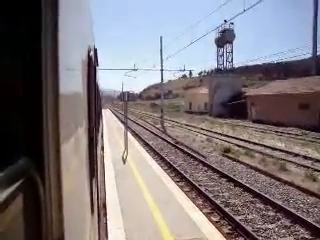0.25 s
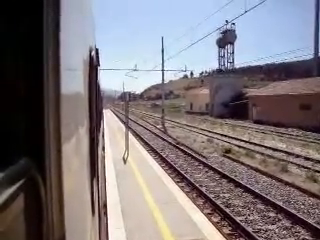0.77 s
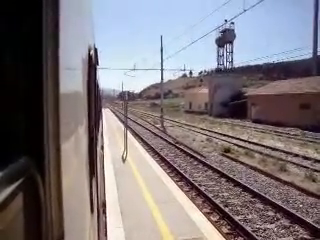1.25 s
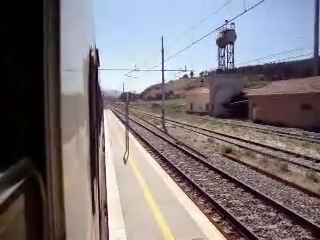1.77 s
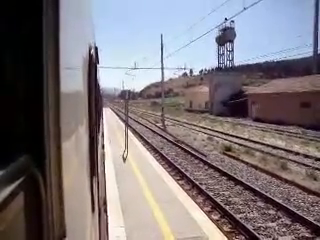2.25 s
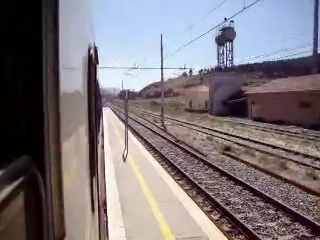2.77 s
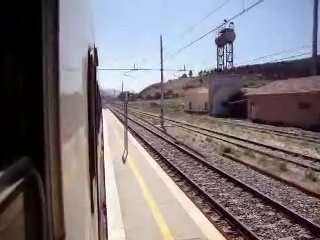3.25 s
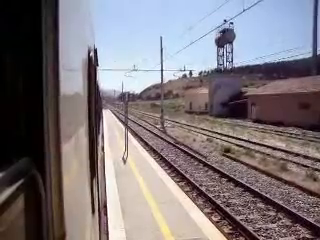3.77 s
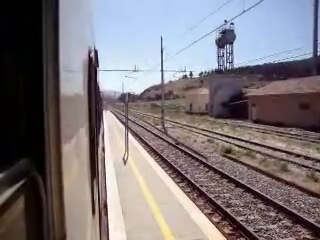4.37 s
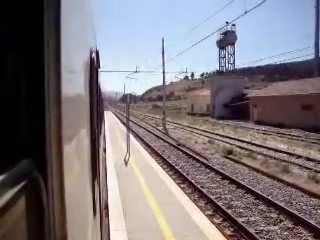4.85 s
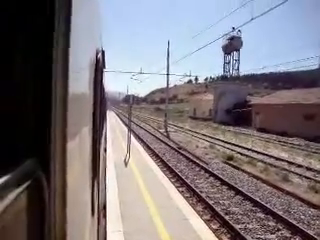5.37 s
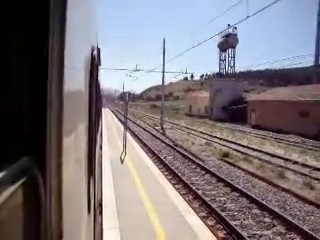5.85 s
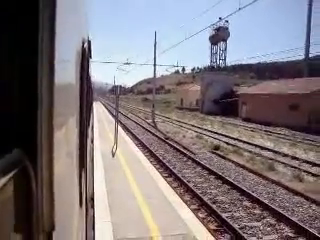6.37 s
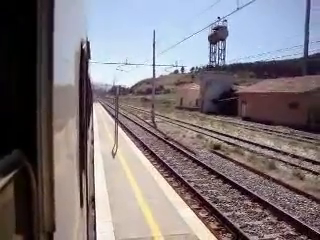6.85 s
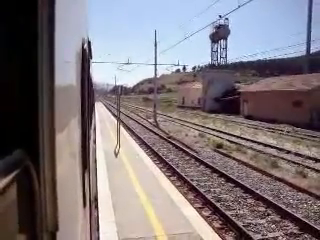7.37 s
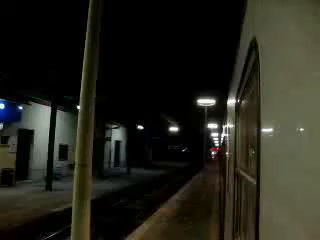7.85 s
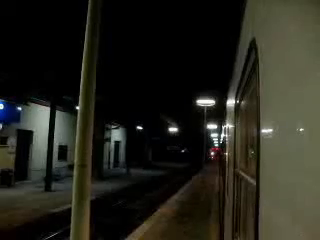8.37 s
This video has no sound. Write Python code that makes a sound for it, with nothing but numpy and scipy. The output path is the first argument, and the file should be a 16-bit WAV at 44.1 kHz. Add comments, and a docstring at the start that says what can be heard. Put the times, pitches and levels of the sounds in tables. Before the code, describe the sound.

A standing electric train hums and whines while wind slaps the microphone, then a machine briefly throbs on a night platform.

```python
"""A standing electric train, heard from its open door: fans and converters hum and whine.
Gusts buffet the microphone with low noise, slaps and cracks.
After a short silence, a platform at night: a machine throbs and drones in a few casing resonances.
A 32 kHz sample-and-hold onto the faster output grid mirrors every tone around 12 kHz."""
import sys
import numpy as np
from scipy import signal
from scipy.fft import rfft, irfft, next_fast_len
from scipy.io import wavfile
from scipy.ndimage import uniform_filter1d, map_coordinates

SR = 44100
rng = np.random.default_rng(int(sys.argv[2]) if len(sys.argv) > 2 else 0)


def materialize(psi):
    """Save the field psi as 16-bit PCM at rate SR to the path in sys.argv[1].

    A 1-D psi becomes a single channel; in a 2-D psi each row is a channel.
    """
    bounded = np.clip(np.atleast_2d(psi).T, -1, 1)
    quanta = np.round(bounded * 32767).astype(np.int16)
    wavfile.write(sys.argv[1], SR, quanta)


N = 379260

# Train hum: t/s, relative level/dB
TRAIN_LEVEL = [(0.0, -26.5), (0.57, -25), (1.5, -21), (1.85, -23.5), (2.1, -22.5), (2.95, -21.5),
               (3.71, -22), (4.24, -20.5), (4.94, -22.5), (5.86, -21.5), (6.08, -26.5), (6.31, -28),
               (7.09, -25.5), (7.26, -28), (7.41, -33), (7.43, -27), (7.58, -33)]
# Fan air noise: f/Hz, relative density/dB
FAN_SPECTRUM = [(30, -26.5), (150, -17.5), (500, -9.5), (900, -2), (1580, -8), (1720, -3.5), (2200, -6),
                (2280, -9), (2800, -13.5), (3550, -15.5), (4100, -13.5), (6500, -23), (10000, -33.5),
                (15800, -90)]
# Motor and converter tones: f/Hz, relative level/dB
TRAIN_TONES = [(183, -46), (341.4, -31), (731.6, -37), (914.6, -35), (987.4, -35), (1050, -39), (1184, -40),
               (1365.8, -34), (1427, -40), (1466.9, -36), (1711.4, -28), (1880, -40), (1955.9, -36),
               (2176, -36), (2200.4, -32), (2444.9, -38), (2665, -44), (2689.4, -42), (2955, -46),
               (3178.4, -44), (3398, -46), (3422.9, -44), (3693, -49), (3911.8, -45), (4597, -51),
               (4889.8, -51)]
# Lift of the tones above 1.5 kHz: t/s, gain/dB
WHINE_GAIN = [(0, 0), (1.2, -2), (2.2, 1.5), (4.5, 0), (5, -0.5), (6.2, 0), (7.6, -1)]
# Steady wind: t/s, relative level/dB
WIND_LEVEL = [(0.0, -42), (0.6, -40), (1.3, -37), (2.3, -43), (3.4, -41.5), (4.2, -40), (5.0, -33.5),
              (5.7, -36), (6.0, -24), (6.5, -29.5), (7.15, -26), (7.34, -42), (7.58, -28)]
# Buffeting: f/Hz, relative density/dB
BUFFET_SPECTRUM = [(25, -35), (60, -12), (150, -2), (300, -2), (600, -6.5), (1500, -17.5), (4000, -45),
                   (15000, -73.5)]
# Soft gusts: peak t/s, relative level/dB, half length/s
SOFT_GUSTS = [(0.407, -31.5, .1), (0.98, -35, 0.041), (1.344, -40, 0.045), (1.685, -30.5, 0.025),
              (3.307, -31.5, .03), (3.41, -32, 0.024), (3.59, -24, 0.037), (4.312, -25.5, 0.034),
              (4.44, -27, 0.037), (4.645, -32, 0.044), (4.853, -41.5, 0.032), (5.244, -29, 0.028),
              (5.33, -29.5, 0.024), (5.82, -30, 0.028)]
# Wind slaps: peak t/s, relative level/dB, f/Hz, relative crack gain/dB, decay scale/ms
WIND_SLAPS = [(0.043, -10.5, 392, -22, 2.1), (0.086, -12, 462, -21, 5.8), (0.215, -12.5, 407, -20, 2.1),
              (0.227, -12, 455, -23, 2.7), (0.334, -10, 403, -13, 1.8), (0.386, -15, 530, -10, 1.1),
              (0.531, -9, 570, -17, 1.9), (0.602, -11.5, 586, -8, 2.8), (1.739, -10, 530, -13, 2.2),
              (1.797, -10, 513, -25, 2.2), (1.849, -13, 345, -20, 3.8), (1.897, -8, 460, -20, 2),
              (3.735, -10, 390, -20, 2.8), (4.737, -8.5, 400, -21, 1.4), (5.031, -13.5, 534, -20, 2),
              (5.084, -13.5, 630, -18, 1.3), (5.097, -13, 436, -11, 1.4), (5.883, -13, 487, -14, 1.4),
              (5.952, -10.5, 550, 1, 1.7), (5.977, -9, 520, -11, 2), (5.994, -8.5, 554, -22, 1.7),
              (6.008, -12, 470, -20, 1.7), (6.046, -10.5, 295, -26, 4), (6.07, -12, 302, -26, 2.9),
              (6.101, -11, 344, -26, 1.7), (6.114, -10.5, 700, -4, 1.8), (6.186, -12, 337, -26, 1.8),
              (6.262, -10.5, 440, -24, 1.5), (6.368, -15, 344, -24, 2.6), (6.433, -10.5, 557, -20, 1.8),
              (6.535, -13, 610, -22, 1.4), (6.558, -10.5, 600, -15, 2.2), (6.573, -11.5, 720, -22, 2.6),
              (6.604, -7.5, 500, -22, 1.2), (6.63, -9, 440, -26, 3.4), (6.642, -12, 594, -20, 2),
              (6.739, -14, 436, -26, 5.4), (6.83, -12.5, 710, -20, 1.1), (6.858, -17, 640, -8, 1.3),
              (6.902, -14, 700, -11, 1.3), (6.971, -11, 530, -18, 1.5), (7.002, -10.5, 476, -17, 1.3),
              (7.023, -13, 270, -9, 2.1), (7.089, -12, 497, -25, 1.4), (7.182, -7.5, 430, -19, 1.6),
              (7.199, -11.5, 515, -1, 2.6), (7.222, -7.5, 567, -15, 3.7), (7.237, -12, 619.4, -10.5, 3.6),
              (7.247, -12, 764, 0.5, 4.4), (7.271, -15.5, 640, -19, 3.8), (7.415, -14.5, 630, -21.5, 2.3),
              (7.44, -9.5, 550, -14, 3.5), (7.49, -14, 504, -16, 2), (7.519, -13.5, 450, 2, 1.8),
              (7.525, -9, 386, 0, 0.73), (7.565, -5.5, 740, -4.5, 1.76)]
# Night machine resonances: f/Hz, width/Hz, relative level/dB
CASING_MODES = [(218.6, 16, -9), (412, 28, -7.5), (492, 15, -5), (570, 30, -3), (710, 51, -2.5),
                (760, 60, -3), (1006, 38, 2.5), (1040, 20, -7), (1257, 130, 0), (1400, 30, -8.5),
                (1742, 20, -6)]
# Night machine broad noise: f/Hz, relative density/dB
DRONE_SPECTRUM = [(25, -64), (80, -19.5), (200, -19.5), (450, -11.5), (800, -7), (1250, -3.5),
                  (1600, -14.5), (2100, -21.5), (3200, -26.5), (4100, -31), (4500, -28), (5500, -32),
                  (6000, -37.5), (15800, -47.5)]


def train():
    """Fan noise under wavering motor and converter tones, plus faint shaft harmonics."""
    shaft_hz = 24.449
    t, whine_db = np.arange(N) / SR, curve(WHINE_GAIN)
    tones = np.zeros(N)
    for hz, db in TRAIN_TONES:
        gain = amp(db + (hz > 1500) * whine_db + 2 * wobble(5))
        tones += gain * np.sin(2 * np.pi * (hz * t + rng.random()) + hz / 5000 * wobble(8))
    pattern = rng.standard_normal(SR // 10)  # repeats each turn
    turns = shaft_hz * t + 0.00036 * wobble(8)
    shaft = map_coordinates(pattern, [turns % 1 * len(pattern)], mode="grid-wrap")
    air = amp(0.6 * wobble(12)) * noise(colour(FAN_SPECTRUM), patchy_db=0.78)
    air += amp(-7) * unit(filtered(shaft, colour(FAN_SPECTRUM)))
    return amp(curve(TRAIN_LEVEL) + 1) * (air + amp(22.5) * tones)


def wind_buffet():
    """Eddies on the microphone port: lumpy low noise, swelling in gusts and around each slap."""
    puff_db, puff_rise_s, puff_fall_s = -17, 0.011, 0.023
    lumps = amp(1.5 * wobble(35) + 2.5 * wobble(150)) * rng.standard_normal(N)
    gusts = [(s, db, half_s, half_s) for s, db, half_s in SOFT_GUSTS]
    puffs = [(s, db + puff_db, puff_rise_s, puff_fall_s) for s, db, *_ in WIND_SLAPS]
    level_db = swells(curve(WIND_LEVEL), gusts + puffs)
    return amp(level_db + 2) * unit(filtered(lumps, colour(BUFFET_SPECTRUM)))


def wind_slaps():
    """Eddies burst on the port: a sharp push and a crack amid a few uneven, slowing swings."""
    swings, cracks, half = np.zeros(N + SR), np.zeros(N + SR), SR // 50
    t = np.arange(-half, half) / SR
    push = 0.7 * np.exp(-(t / 0.0003) ** 2)
    from_peak_ms = 1000 * np.where(t < 0, -1.1 * t, t)  # rise faster than fall
    for peak_s, db, hz, crack_db, decay_ms in WIND_SLAPS:
        start = round(peak_s * SR) - half
        span = slice(start, start + len(t))
        decay = from_peak_ms / decay_ms
        drift = np.cumsum(rng.standard_normal(len(t))) / np.sqrt(SR / hz)
        phase = 2 * np.pi * hz * (t - 40 * t * t) + 1.46 * (drift - drift[half])
        swing = np.exp(-(decay / 1.72) ** 0.97) * np.cos(phase)
        swings[span] += rng.choice([-1, 1]) * amp(db) * (push + swing)
        cracks[span] += amp(db + crack_db) * np.exp(-decay / 1.05) * rng.standard_normal(len(t))
    highpass = lambda f: (1j * f / 120 / (1 + 1j * f / 120)) ** 2
    bandpass = lambda f: 1j * f * 2500 / (1800 ** 2 - f * f + 1j * f * 2500) / (1 + 1j * f / 3500) ** 3
    return filtered(swings[:N], highpass) + amp(13.5) * filtered(cracks[:N], bandpass)


def night_machine():
    """Noise rings in the casing and throbs evenly; the broad hiss is steadier."""
    steady_db, throb_db = -27, -21.5
    first_s, period_s, rise_s, fall_s = 7.655, 0.2077, 0.022, 0.14
    level_db = swells(steady_db, [(first_s + k * period_s, throb_db, rise_s, fall_s) for k in range(5)])
    casing = lambda f: np.sqrt(sum(amp(2 * db) / (1 + (2 * (f - hz) / width_hz) ** 2) ** 2
                                   for hz, width_hz, db in CASING_MODES))
    ring = amp(level_db + 0.88 * wobble(30)) * noise(casing, patchy_db=1.5)
    hiss_db = 0.54 * level_db - 10.34 + 0.75 * wobble(33)
    return ring + amp(hiss_db) * noise(colour(DRONE_SPECTRUM), patchy_db=2.0)


def amp(db):
    """dB to gain."""
    return 10 ** (np.asarray(db) / 20)


def unit(x):
    """x at rms 1."""
    return x / np.sqrt(np.mean(x ** 2) + 1e-20)


def curve(rows):
    """Rows (t/s, level/dB) to dB per sample."""
    times_s, db = np.transpose(rows)
    return np.interp(np.arange(N) / SR, times_s, db)


def swells(steady_db, rows):
    """Power sum in dB of a steady level and swells (t/s, level/dB, rise/s, fall/s)."""
    t = np.arange(N) / SR
    power = sum(amp(2 * db) * np.exp(-((t - s) / np.where(t < s, rise_s, fall_s)) ** 2)
                for s, db, rise_s, fall_s in rows)
    return 10 * np.log10(amp(2 * steady_db) + power)


def wobble(rate_hz):
    """Smooth random curve, knots at rate_hz."""
    knots = rng.standard_normal(int(N * rate_hz / SR) + 4)
    return map_coordinates(knots, [np.arange(N) * rate_hz / SR])


def filtered(x, response):
    """FFT filter with gain response(f/Hz)."""
    size = next_fast_len(N + 8192)
    return irfft(rfft(x, size) * response(np.fft.rfftfreq(size, 1 / SR)), size)[:N]


def colour(rows):
    """Response through rows (f/Hz, level/dB) on a log axis."""
    hz, db = np.transpose(rows)
    return lambda f: amp(np.interp(np.log(f + 1), np.log(hz + 1), db))


def noise(response, patchy_db):
    """Coloured noise, rms 1, with random gain patches in time and frequency."""
    bins = signal.stft(rng.standard_normal(N), nperseg=512)[2]
    patches = uniform_filter1d(rng.standard_normal(bins.shape), size=6, axis=0)
    patches = unit(uniform_filter1d(patches, size=10, axis=1))
    patchy = signal.istft(bins * amp(patchy_db * patches), nperseg=512)[1][:N]
    return unit(filtered(patchy, response))


def scene():
    """Train and wind, silence, night machine; dual mono."""
    day_end_s, night_start_s = 7.579, 7.668
    t = np.arange(N) / SR
    day = np.clip((day_end_s - t) / 0.0096, 0, 1)
    night = np.clip((t - night_start_s) / 0.028, 0, 1)
    mono = day * (train() + wind_buffet() + wind_slaps()) + night * night_machine()
    return np.array([mono, mono])


def record(dry):
    """Soft clip, sample-and-hold restarted each block, band limit."""
    hold_hz, top_hz, block_samples = 32000, 15750, 1587
    clipped = dry[0] / (1 + np.abs(dry[0] / 0.75) ** 6) ** (1 / 6)
    block, offset = np.divmod(np.arange(N), block_samples)
    held_at = block * block_samples + np.floor(offset * hold_hz / SR) * SR / hold_hz
    mono = filtered(map_coordinates(clipped, [held_at]), lambda f: f < top_hz)
    return np.array([mono, mono])


dry = scene()
out = record(dry)
materialize(out)
```